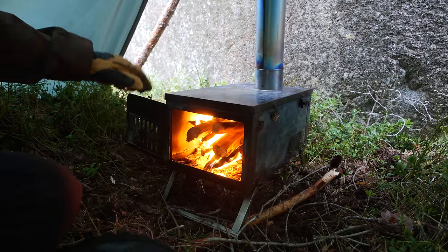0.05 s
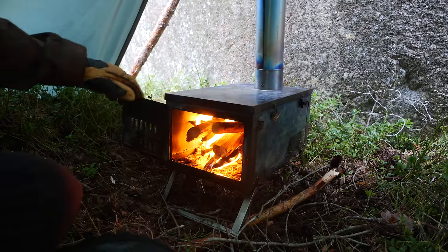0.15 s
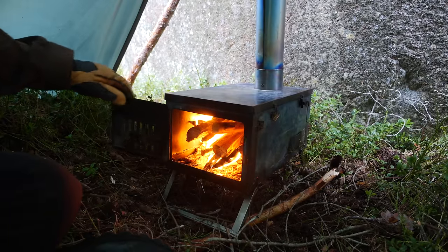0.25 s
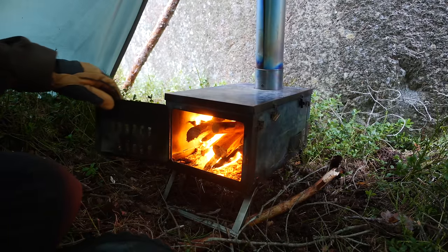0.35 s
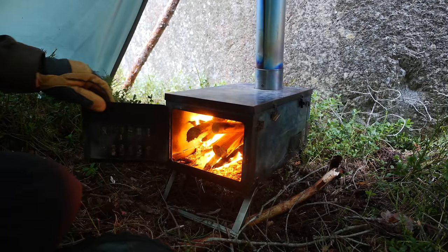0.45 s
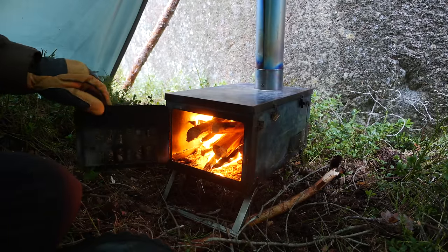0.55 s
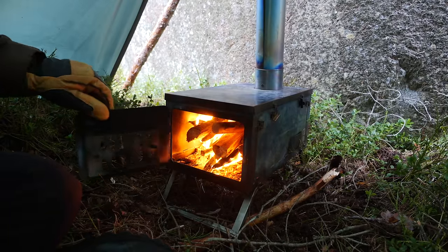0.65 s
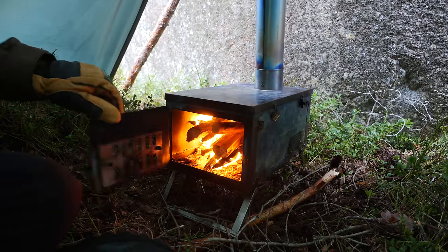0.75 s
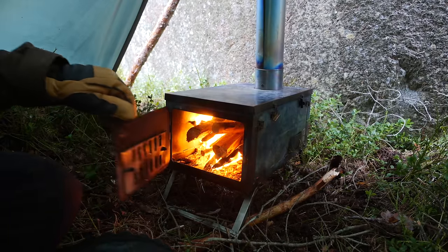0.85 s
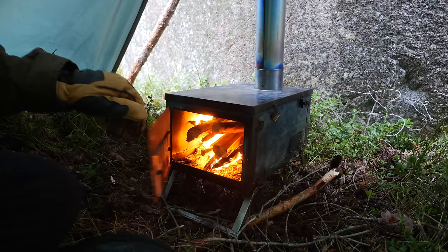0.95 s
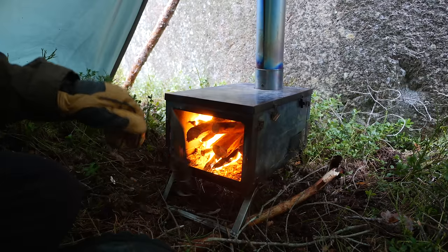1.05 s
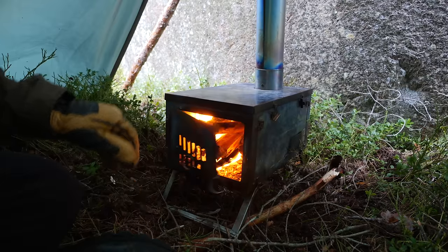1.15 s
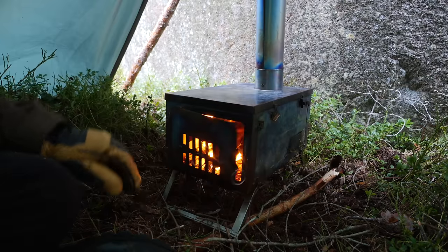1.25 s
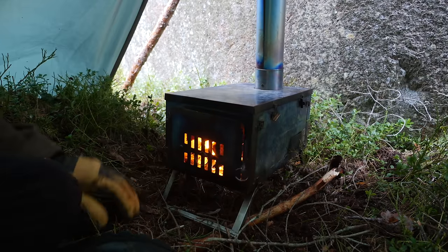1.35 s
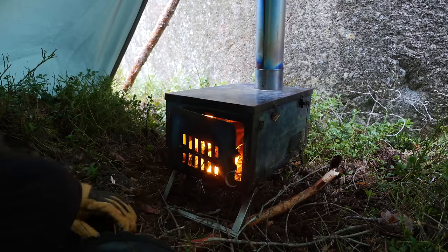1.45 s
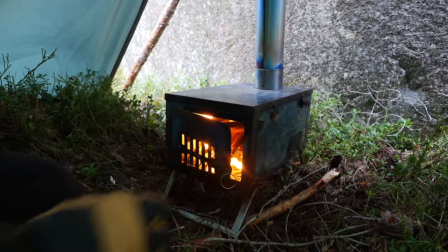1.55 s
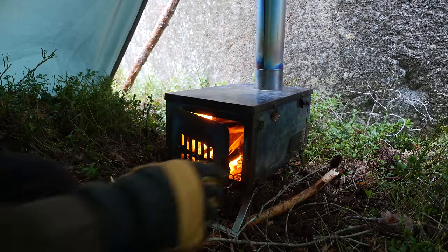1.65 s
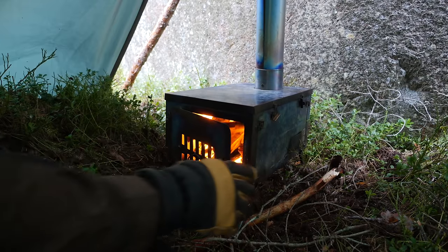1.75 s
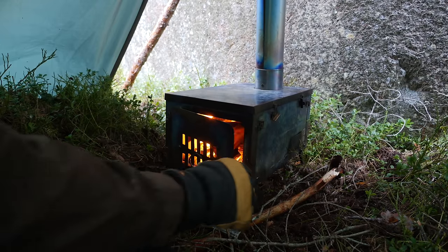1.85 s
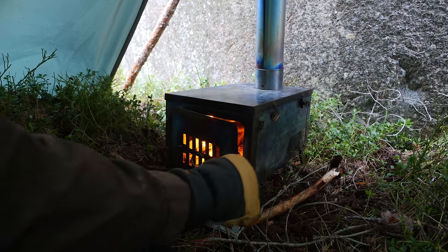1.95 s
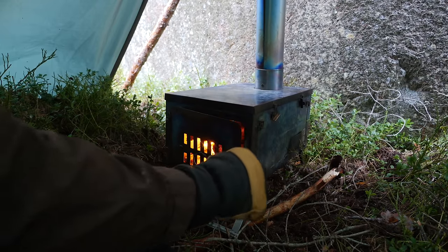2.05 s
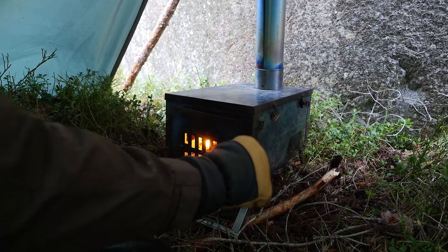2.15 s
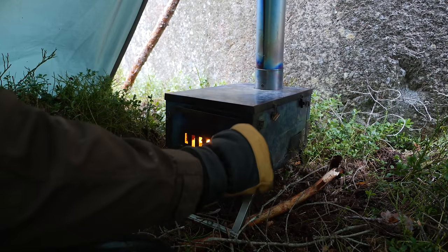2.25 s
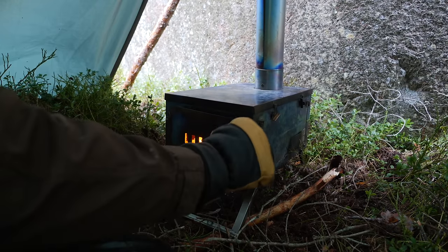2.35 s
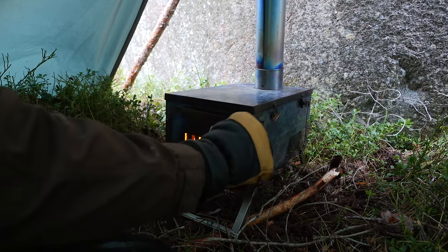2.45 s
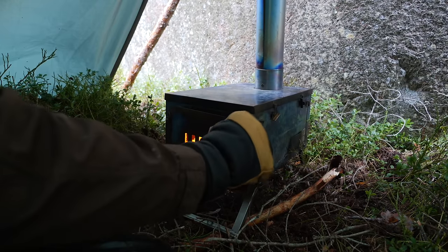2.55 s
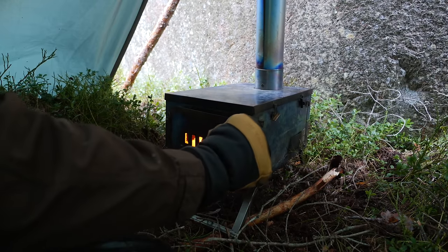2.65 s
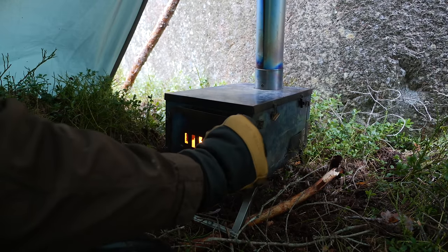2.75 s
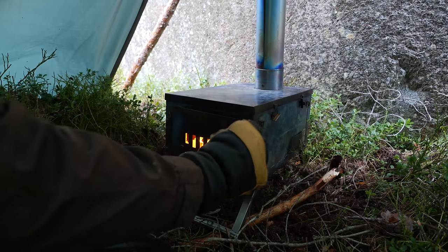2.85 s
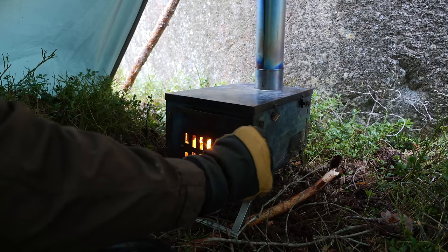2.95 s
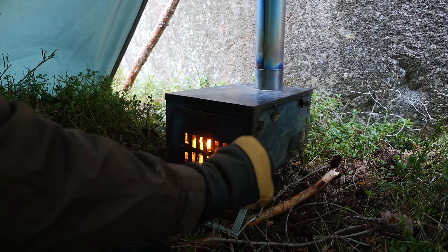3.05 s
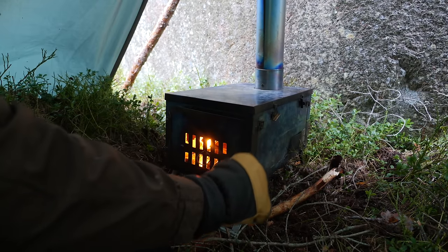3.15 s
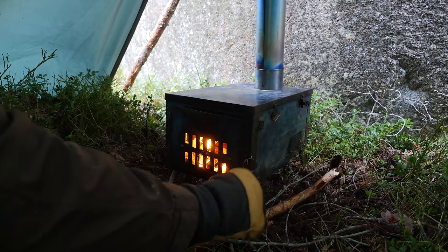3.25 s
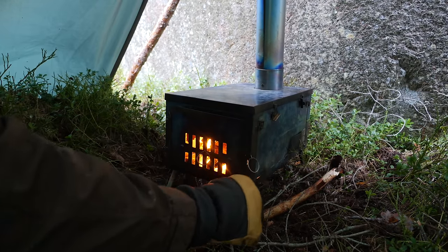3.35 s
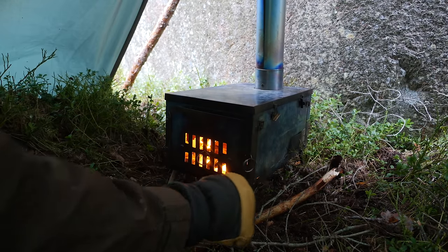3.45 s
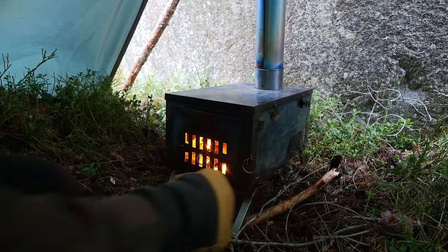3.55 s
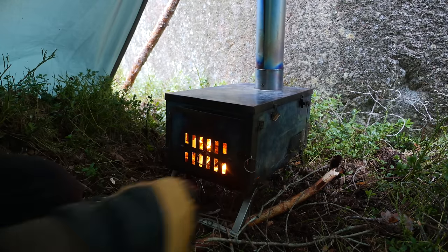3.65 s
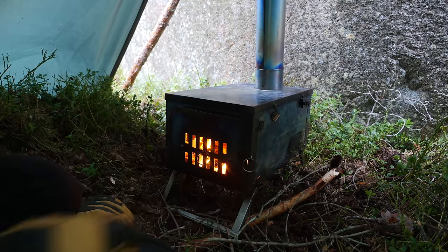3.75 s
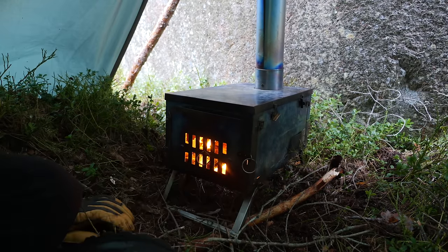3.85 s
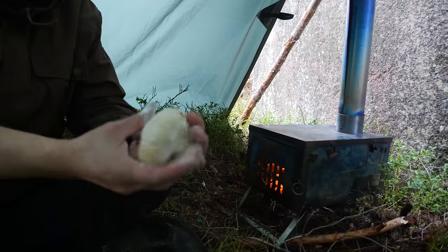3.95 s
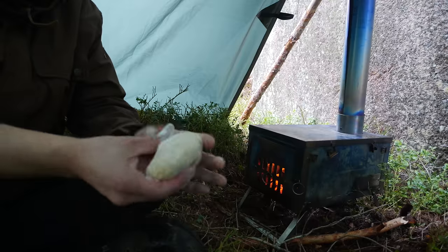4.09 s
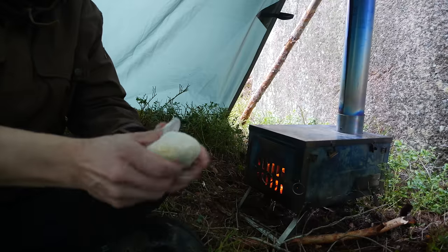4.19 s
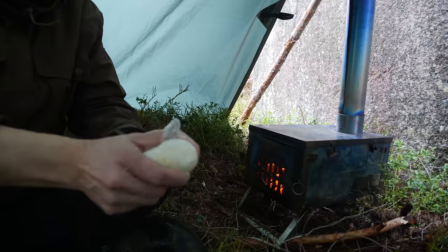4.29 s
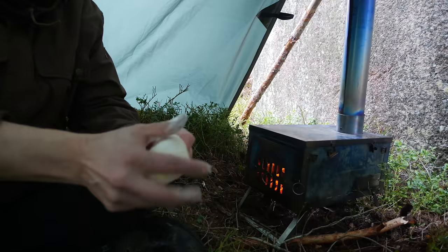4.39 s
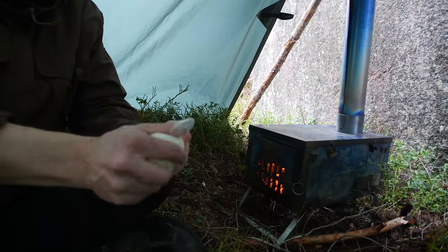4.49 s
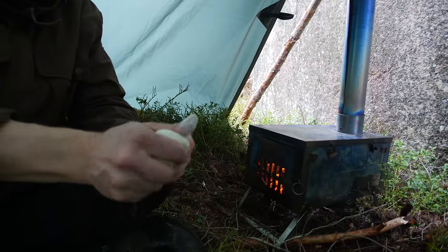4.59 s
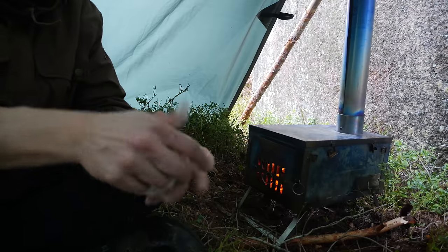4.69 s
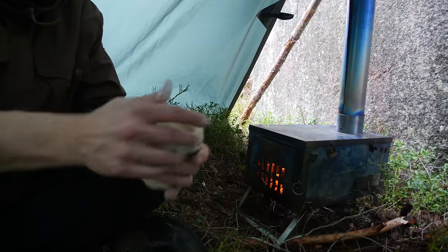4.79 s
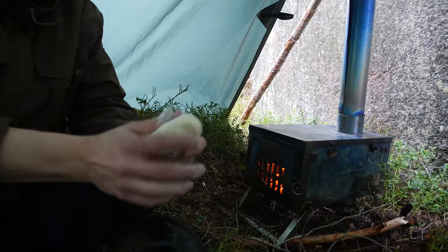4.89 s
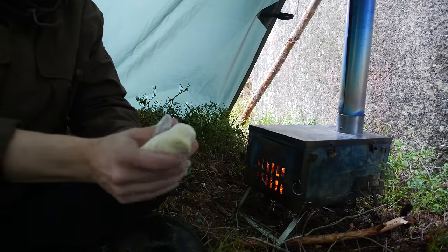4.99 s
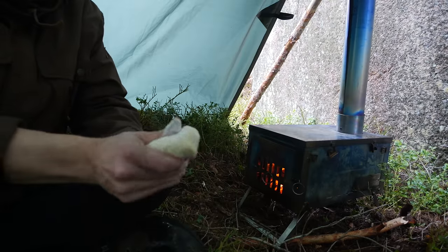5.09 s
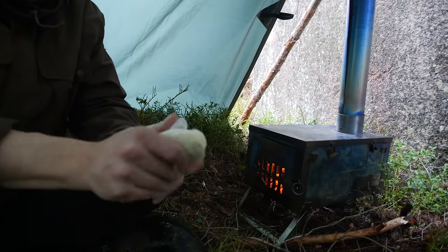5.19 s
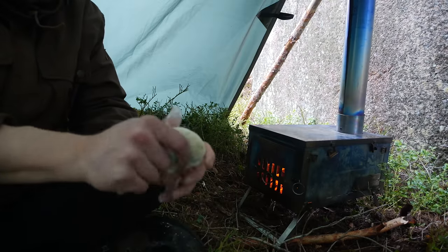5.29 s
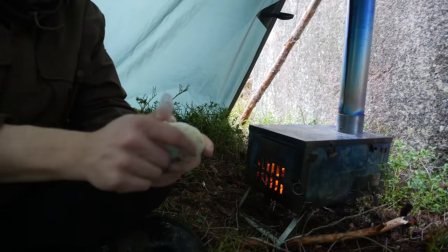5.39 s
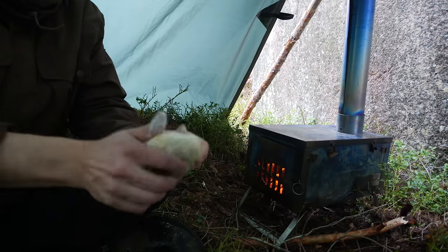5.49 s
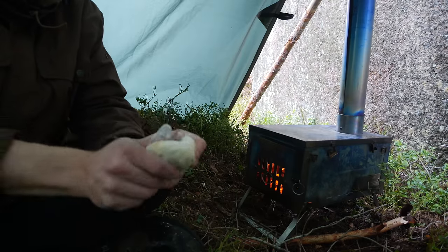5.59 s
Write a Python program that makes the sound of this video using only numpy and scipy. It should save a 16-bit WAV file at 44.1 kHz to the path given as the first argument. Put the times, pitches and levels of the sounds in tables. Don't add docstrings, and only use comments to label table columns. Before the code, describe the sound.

A gloved hand swings a thin stove door with light knocks and gritty drags, then slams it with a bright clang and brief chatter. Cloth brushes past, the latch is worked with sharp clacks and drops shut. The low hush of fire and outdoors dips at the cut, leaving muffled pats and skin rubbing dough. Close microphone, very short dull fabric tail.

```python
import sys
import numpy as np
from scipy import signal
from scipy.fft import rfft, irfft, next_fast_len
from scipy.io import wavfile
from scipy.ndimage import uniform_filter1d

SR = 44100
rng = np.random.default_rng(int(sys.argv[2]) if len(sys.argv) > 2 else 0)


def magnitude_from_level(level_db):
    exponent = np.asarray(level_db, float) / 20
    return 10 ** exponent


def master_out(mix):
    frames = np.transpose(np.atleast_2d(mix))
    ceiling = np.clip(frames, -1, 1)
    pcm = np.round(ceiling * 32767).astype(np.int16)
    wavfile.write(sys.argv[1], SR, pcm)


N = 248179

# f/Hz, density/dB per Hz
STEEL_SPECTRUM = [(71, -34), (120, -8), (170, 0.5), (237, 2.5), (358, -3.5), (540, -1.5), (832, 2),
                  (922, -2.5), (1260, -1), (4600, -8.5), (8020, -9.5), (10500, -13), (14000, -14),
                  (15500, -16), (16500, -35)]


def evened(x):
    return x / np.sqrt(np.mean(x ** 2) + 1e-20)


def read(points, hz):
    f, value = np.transpose(points)
    return np.interp(np.log(hz + 1), np.log(f + 1), value)


def add(mix, s, sound):
    part = mix[round(s * SR):][:len(sound)]
    part += sound[:len(part)]


def strokes(rows):
    stroke_db = 24.5
    dulling = 0.18
    s, level_db, rise, fall, tilt = np.transpose(rows)[:, :, None]
    t = np.arange(max(s.min() - .12, 0), min(s.max() + .3, N / SR), .001)
    lost_db = stroke_db * np.maximum((s - t) / abs(rise), (t - s) / abs(fall))
    power = magnitude_from_level(2 * (level_db - lost_db)) + 1e-14
    total = power.sum(0)
    dulled = tilt - dulling * np.minimum(lost_db, 30)
    return np.c_[t, 10 * np.log10(total), (power * dulled).sum(0) / total]


def grains(size, per_s, spread_db, hiss):
    hit = rng.random(size) < per_s / SR
    big = np.minimum(rng.exponential(1, size), 4)
    noise = rng.standard_normal((2, size))
    clicks = hit * magnitude_from_level(spread_db * big) * np.sign(noise[0])
    return evened(clicks) + hiss * noise[1]


def shaped(x, colour, tilt, patchy_db):
    hz, t, z = signal.stft(x, SR, nperseg=512, noverlap=384)
    patches = uniform_filter1d(rng.standard_normal(z.shape), 6, 0)
    patches = evened(uniform_filter1d(patches, 14, 1))
    z = z * magnitude_from_level(read(colour, hz)[:, None] + patchy_db * patches)
    z = z / np.sqrt(2 * np.mean(np.sum(abs(z[12:70]) ** 2, 0)) / 1.5)
    octaves = np.log2((hz[:, None] + 200) / 2500)
    slope_db = np.interp(t, np.arange(len(x)) / SR, tilt) * octaves
    return signal.istft(z * magnitude_from_level(slope_db), SR, nperseg=512, noverlap=384)[1][:len(x)]


def rub(tables, colour, per_s, spread_db, hiss, patchy_db, bodies=([1.],)):
    out = np.zeros(N)
    for rows in tables:
        s, level_db, tilt = np.transpose(rows)
        t = np.arange(s[0], s[-1], 1 / SR)
        drive = np.zeros(len(t))
        for body in bodies:
            drive += signal.oaconvolve(grains(len(t), per_s, spread_db, hiss), body)[:len(t)]
        sound = shaped(drive, colour, np.interp(t, s, tilt), patchy_db)
        ends = signal.windows.tukey(len(t), min(800 / len(t), 1))
        add(out, s[0], sound * magnitude_from_level(np.interp(t, s, level_db)) * ends)
    return out


def air():
    # f/Hz, density/dB per Hz
    hush_spectrum = [(13, -33), (22, -24), (289, -3), (628, -9.5), (702, -9), (762, -4.5), (1330, -11.5),
                     (2310, -16), (3910, -15.5), (5450, -18.5), (13200, -23), (15200, -23), (16500, -42)]
    hush_db, hush_drop_db = -56, -4
    roar_db, roar_drop_db, roar_top_hz = -59.5, -5, 152
    change_s = 3.96
    hz, _, z = signal.stft(rng.standard_normal(N), SR, nperseg=2048)
    z = z * magnitude_from_level(read(hush_spectrum, hz))[:, None]
    hush = evened(signal.istft(z, SR, nperseg=2048)[1][:N])
    low_band = signal.butter(2, [38, roar_top_hz], "band", fs=SR)
    roar = evened(signal.lfilter(*low_band, rng.standard_normal(N)))
    lumps = evened(uniform_filter1d(rng.standard_normal(N), 2000))
    after = np.clip((np.arange(N) / SR - change_s) / 0.0067, 0, 1)
    hush *= magnitude_from_level(hush_db + hush_drop_db * after)
    return hush + magnitude_from_level(roar_db + 2.4 * lumps + roar_drop_db * after) * roar


def tent(x):
    t60 = .16
    t = np.arange(SR // 4) / SR
    tail = rng.standard_normal(len(t)) * magnitude_from_level(-60 * t / t60) * (t > .004)
    tail = signal.lfilter(*signal.butter(1, 6000, fs=SR), tail)
    return signal.fftconvolve(x, tail / np.linalg.norm(tail))[:N]


def dough():
    # peak t/s, level/dB, rise/s, fall/s, tilt/dB per octave
    kneading = [(3.97, -55.5, 0.017, 0.32, 1.5), (4.0, -57, .015, 0.18, -2), (4.19, -63, 0.11, 0.17, 1),
                (4.14, -57.5, 0.08, 0.037, -1), (4.31, -64, 0.05, 0.17, 3), (4.415, -65, 0.037, 0.092, 6),
                (4.29, -70, 0.74, 0.78, 7), (4.446, -54, 0.13, 0.02, 2.5), (4.52, -59.5, 0.62, 0.25, -2),
                (4.588, -60, 0.054, 0.31, -1), (4.664, -55, 0.01, .03, -2), (4.71, -56.5, 0.04, 0.036, 0.3),
                (4.804, -54, 0.13, 0.14, 0.5), (4.912, -59, .02, .1, -1), (4.945, -56, 0.17, 0.24, -1.5),
                (5.05, -56.5, 0.27, 0.2, 0.5), (5.28, -53, 0.36, 0.089, -1.1), (5.2, -64.5, 0.066, 0.12, 8),
                (5.295, -59.5, 0.089, .06, 3), (5.41, -60.5, 0.055, .2, -1), (5.49, -56, 0.15, 0.28, -1),
                (5.535, -57, .1, .05, 0), (5.59, -57, 0.057, 0.43, -3)]
    # f/Hz, density/dB per Hz
    skin = [(180, -9), (300, -6.5), (1450, -9.5), (1630, -7.5), (1870, -11.5), (2240, -9), (2610, -9.5),
            (8440, -7), (14900, -9.5), (15700, -15), (16500, -39)]
    return rub([strokes(kneading)], skin, per_s=3000, spread_db=0.5, hiss=0.79, patchy_db=-0.5)


def sleeve():
    # t/s, level/dB, tilt/dB per octave
    sweeps = [
        [(1.46, -47, -6), (1.55, -44, -1), (1.62, -43.5, 1.5), (1.78, -43, 1), (1.86, -48.5, -0.4),
         (1.93, -60, 0.5)],
        [(3.48, -48, 1), (3.56, -51.5, 0), (3.7, -46.5, 0.1), (3.86, -49.5, -1), (3.92, -49, -0.5),
         (3.965, -50, -0.5)],
    ]
    # f/Hz, density/dB per Hz
    cloth = [(59, -32), (100, -5.5), (427, 4), (507, -6), (745, 2.5), (963, -2.5), (1120, 1), (1870, -3.5),
             (8150, -12), (15100, -20), (16500, -40)]
    return rub(sweeps, cloth, per_s=5900, spread_db=1.5, hiss=0.85, patchy_db=1.3)


def thumps():
    # t/s, peak/dB, f/Hz, t60/s
    knocks = [(0.168, -29, 197, 0.027), (0.214, -42.5, 190, 0.45), (0.521, -36.5, 133, 0.14),
              (0.58, -44, 110, 0.12), (1.375, -26.5, 169, 0.2), (1.878, -47, 97, .08),
              (2.2, -28, 99, 0.032), (2.568, -43, 188, 0.19), (2.822, -31, 106, 0.04),
              (3.138, -45, 160, 0.22), (3.367, -27, 119, 0.023), (3.526, -24.5, 104, 0.025),
              (3.836, -36.5, 103, 0.059), (4.27, -49.5, 104, 0.11), (4.039, -37.5, 139, 0.038),
              (4.398, -39, 142, 0.043), (5.035, -44.5, 150, 0.082), (5.262, -44.5, 200, .05)]
    out, t = np.zeros(N), np.arange(8000) / SR
    for s, db, hz, t60 in knocks:
        swell = 1 - np.exp(-t / 0.0032)
        add(out, s, magnitude_from_level(db - 60 * t / t60) * np.sin(2 * np.pi * hz * t) * swell)
    return out


def snaps():
    # t/s, peak/dB, centre f/Hz
    crackle = [(.2824, -41, 15500), (.2964, -43, 15500), (.3094, -40, 15300), (.5695, -16, 14000),
               (1.0744, -40, 15100), (1.0994, -44, 15100), (1.3651, -9, 13500), (1.3896, -18, 13500),
               (1.408, -15, 13000), (1.427, -22, 14800), (1.4596, -30, 13500), (2.181, -31, 14500),
               (3.3312, -42, 13500), (3.3438, -46, 12700), (3.3722, -44, 13000), (3.3846, -46, 12900),
               (3.430, -48, 13400), (3.8944, -36, 15100), (3.9865, -25, 13500)]
    # t/s, peak/dB, centre f/Hz
    ticks = [(0.338, -41.5, 3320), (.531, -27, 3180), (0.5693, -24, 6500), (0.667, -36, 4500),
             (1.1447, -29, 3160), (1.1817, -41, 2200), (1.2048, -34, 3000), (1.2165, -38, 7800),
             (1.236, -28.5, 1920), (2.1808, -26, 8130), (2.4836, -39, 7600), (2.7796, -34, 2400),
             (2.8948, -31, 3250), (2.9193, -28, 3300), (3.399, -44, 4000), (4.6638, -46, 5380),
             (4.7032, -44, 7770), (5.27, -41, 3000)]
    # t/s, peak/dB, t60/s
    latch = [
        (1.3629, -10, .012),
        (1.365, -5.5, .022),
        (1.947, -24.5, .12),
        (2.0145, -33, .08),
        (2.832, -42, .25),
        (3.4667, -20, .1),
        (3.4695, -22, .03),
        (3.562, -27, .015),
    ]
    rows = [(*row, 0.0041) for row in crackle]
    rows += [(*row, 0.019) for row in ticks]
    rows += [(s, db, 7400, t60) for s, db, t60 in latch]
    out, t = np.zeros(N), np.arange(2000) / SR
    for s, db, hz, t60 in rows:
        snap = rng.standard_normal(len(t)) * magnitude_from_level(-60 * t / t60)
        snap[0] = 6
        for _ in range(1 + (hz > 10000)):
            snap = signal.lfilter(*signal.iirpeak(min(hz, 15500), 2.2, SR), snap)
        add(out, s, magnitude_from_level(db) * snap / abs(snap).max())
    return out


def squeaks():
    # t/s, peak/dB, pitch f/Hz, length/s, octave level/dB
    slips = [(.365, -47, 2050, .03, -12), (.42, -46, 3650, .085, -25), (.73, -46, 1300, .07, -25),
             (.86, -42, 1030, .06, -14), (.916, -42, 6680, .025, -7), (1.47, -37, 780, .055, -12),
             (.957, -43, 8020, .022, -18), (.967, -43, 7400, .038, -22), (1.224, -43, 900, .035, -25),
             (1.255, -45, 780, .06, -25), (1.59, -41, 1300, .045, -25), (2.27, -45, 1500, .025, -4),
             (2.335, -53, 3250, .035, -25), (3.156, -31, 7900, .012, -30), (3.467, -32, 4850, .008, -25),
             (3.47, -39, 7350, .055, -30), (3.468, -40, 8050, .02, -30), (3.492, -43, 5380, .03, -25),
             (4.803, -43, 3600, .022, -25), (4.965, -60, 4270, .045, -25), (5.0, -56, 3950, .075, -25),
             (5.265, -49, 2200, .03, -25)]
    out = np.zeros(N)
    for s, db, hz, length, octave_db in slips:
        t = np.arange(0, length, 1 / SR)
        wobble = evened(uniform_filter1d(rng.standard_normal(4000), 90))[:len(t)]
        pitch = hz * (1 + .005 * wobble) + 28 * wobble
        turn = 2 * np.pi * np.cumsum(pitch) / SR
        shape = (1 - np.exp(-t / .002)) * np.cos(np.pi / 2 * t / length) * (1 + .5 * wobble[::-1])
        add(out, s, magnitude_from_level(db) * shape * (np.sin(turn) + magnitude_from_level(octave_db) * np.sin(2 * turn)))
    return out


def gap_whistle():
    # t/s, level/dB, pitch f/Hz
    squeeze = [
        (1.368, -40, 1600),
        (1.382, -29, 1380),
        (1.395, -27, 1230),
        (1.408, -28, 1060),
        (1.42, -40, 980),
    ]
    width_hz = 80
    s, level_db, hz = np.transpose(squeeze)
    t = np.arange(s[0], s[-1], 1 / SR)
    low_pass = signal.butter(1, width_hz / 2, fs=SR)
    slow = signal.lfilter(*low_pass, rng.standard_normal((2, 4000)))[:, -len(t):]
    turn = 2 * np.pi * np.cumsum(np.interp(t, s, hz)) / SR
    whistle = evened((evened(slow[0]) + 1) * np.cos(turn) + evened(slow[1]) * np.sin(turn))
    out = np.zeros(N)
    add(out, s[0], magnitude_from_level(np.interp(t, s, level_db)) * whistle * signal.windows.tukey(len(t), .2))
    return out


def struck_modes():
    # t/s, peak/dB, f/Hz, t60/s
    struck = [(.176, -43, 13000, .04), (0.176, -38, 586, 0.026), (.2005, -41, 14300, .05),
              (.43, -38.5, 3130, 0.067), (0.4643, -40, 3240, 0.054), (.506, -39, 2780, .03),
              (.518, -40, 3300, .04), (.533, -36, 3200, .08), (.574, -40, 1280, .03),
              (.593, -43, 3200, .12), (1.37, -29, 1690, .2), (1.3645, -14, 7410, .022),
              (1.3648, -15, 9120, .02), (1.3648, -14, 13000, .022), (1.42, -36, 986, 0.2),
              (1.372, -37, 475, 0.38), (1.375, -36, 297, 0.25), (1.364, -31.5, 670, 0.18),
              (1.4, -38, 1630, .3), (1.49, -37, 599, 0.15), (2.022, -39, 7780, 0.089),
              (2.023, -45, 13500, .04), (2.073, -51, 13500, .015), (2.226, -51, 12600, .03),
              (2.779, -26, 3000, 0.0035), (2.8943, -34, 1660, 0.044), (2.8965, -41.5, 3490, 0.11),
              (2.92, -32.5, 1400, 0.03), (2.92, -41, 3430, 0.093), (3.1825, -27.5, 2090, 0.064),
              (3.1835, -34, 7900, 0.07), (3.182, -37, 3130, .08), (3.1828, -33, 14000, .04),
              (3.2385, -38, 3290, 0.21), (3.2393, -32, 7900, 0.036), (3.2393, -32, 13000, .03),
              (3.239, -39, 1280, .04), (3.3496, -55, 14500, 0.0091), (3.3616, -62.5, 9200, 0.014),
              (3.358, -58, 2870, 0.16), (3.3978, -49, 2500, 0.0074), (3.466, -27, 13900, .02),
              (3.4668, -34, 4920, 0.057), (3.4673, -33.5, 686, 0.045), (3.483, -31, 12500, .012),
              (3.5474, -58, 12700, .015), (3.5625, -36, 13600, .02), (3.987, -39.5, 8300, 0.014),
              (4.661, -52.5, 654, 0.089), (4.92, -49, 7400, .03)]
    # t/s, peak/dB, f/Hz, t60/s
    soft = [(3.12, -38.5, 70, 0.14), (3.209, -44, 90, 0.13), (3.29, -44, 75, .12), (3.68, -51, 69, 0.088),
            (3.98, -45, 90, 0.074), (4.1, -47, 80, 0.092), (4.29, -44, 220, 0.052),
            (4.504, -47.5, 336, 0.055), (4.56, -46, 109, 0.088), (4.59, -52, 300, 0.067),
            (4.91, -44, 90, .08), (4.94, -46, 289, 0.072), (4.98, -44, 90, .06), (5.115, -37, 152, 0.043),
            (5.19, -56, 7500, .04), (5.262, -47, 567, .05), (5.268, -49, 920, .05), (5.41, -43, 140, .05),
            (5.49, -48, 90, .06), (5.53, -48, 100, 0.051), (5.59, -59, 220, .06)]
    # t/s, peak/dB, f/Hz, t60/s
    left_ringing = [(.37, -48, 1606, .16), (.374, -46, 2340, 0.16), (.409, -42, 4500, .05),
                    (.411, -47, 5050, .1), (.488, -43, 1020, .08), (1.366, -31, 5200, 0.13),
                    (1.368, -26, 8300, 0.23), (1.392, -30, 330, 0.13), (1.452, -29.5, 1040, .12),
                    (1.495, -33, 723, .12), (2.896, -44, 2342, .15), (3.157, -25, 5030, 0.021),
                    (3.156, -39, 2990, .09), (3.158, -31, 297, .1), (3.188, -34, 1300, 0.073),
                    (3.25, -34.5, 994, 0.12), (3.725, -43, 1120, 0.1), (3.798, -50, 350, 0.073)]
    out, t = np.zeros(N), np.arange(8000) / SR
    for rows, neighbour in [(struck + soft, .4), (left_ringing, 0)]:
        for s, db, hz, t60 in rows:
            tone = np.sin(2 * np.pi * hz * t)
            tone += neighbour * np.sin(2 * np.pi * hz * rng.uniform(.95, 1.05) * t)
            add(out, s, magnitude_from_level(db - 60 * t / t60) * tone * (1 - np.exp(-t * hz / 2)))
    return out


def latch_slide():
    # peak t/s, level/dB, rise/s, fall/s, tilt/dB per octave
    slide = [
        (3.46, -52.5, 0.044, .02, 0.93),
    ]
    return rub([strokes(slide)], STEEL_SPECTRUM, per_s=1300, spread_db=0.0, hiss=0.4, patchy_db=1.0)


def moan():
    # peak t/s, level/dB, rise/s, fall/s
    drags = [
        (.16, -53, 0.023, 0.11),
        (.56, -60, .1, .4),
        (.8, -58, .12, .3),
        (1.03, -53, 0.69, 0.25),
        (2.256, -46, 0.14, 0.35),
        (2.43, -51.5, 0.36, 0.17),
        (2.538, -48.5, 0.13, 0.091),
        (2.932, -48.5, 0.12, 0.071),
        (3.174, -41.5, 0.1, 0.24),
        (3.451, -55, 0.018, 0.026),
    ]
    mode_hz, width_hz = 350, 57
    hum = signal.lfilter(*signal.iirpeak(mode_hz, mode_hz / width_hz, SR), rng.standard_normal(N))
    s, level_db, _ = strokes([(*row, 0) for row in drags]).T
    return evened(hum) * magnitude_from_level(np.interp(np.arange(N) / SR, s, level_db))


def sheet(count=520):
    # f/Hz, t60/s
    decay = [(150, 0.76), (500, 0.7), (1200, 0.49), (3000, 0.66), (7500, 0.35), (14000, 0.31)]
    # f/Hz, rise/s
    swing_up = [
        (200, 0.045),
        (1200, 0.01),
        (3000, 0.0017),
        (8000, 0.00077),
    ]
    # f/Hz, level above the rest/dB
    strong = [(190, 6), (355, 5), (1032, 6), (1088, 5), (1224, 3), (2990, 3), (3780, 3), (5300, 4),
              (7040, 3), (7380, 5), (7900, 4), (8270, 3), (12300, 2), (12570, 3)]
    strong_hz, strong_db = np.transpose(strong)
    even_hz = np.linspace(130, 16900, count) + rng.uniform(-14, 14, count)
    hz = np.r_[strong_hz, even_hz][:, None]
    t60 = read(decay, hz) * rng.uniform(1.0, 1.02, hz.shape)
    t = np.arange(SR // 4) / SR
    ring = np.exp((2j * np.pi * hz - np.log(1000) / t60) * t)
    ring = ring * (1 - np.exp(-t / read(swing_up, hz)))
    return hz[:, 0], np.r_[strong_db, np.zeros(count)], ring


def steel(count=3):
    # t/s, peak/dB, door body/dB, hard edge/dB, t60 left by glove and frame/s
    blows = [(0.138, -50, -2, 12.5, 0.18), (0.156, -26, 12.5, -6, 0.096), (0.2007, -24, 6, 4.5, 0.062),
             (0.376, -24.5, 5.5, -12, 0.1), (0.4126, -30, -8.5, -10, 0.26), (0.529, -36, 8.5, 5, 0.85),
             (0.798, -25.5, -8.5, 2.5, 0.29), (1.144, -38, -10, 11, 0.089), (1.948, -19.5, -15.5, -3, 0.24),
             (2.0132, -33, 15, -8, 0.11), (2.024, -26.5, -8, 4, 0.091), (2.0397, -23.5, -19, 10, 0.091),
             (2.2389, -12.5, -13, -9, 0.087), (2.5194, -31.5, 16, 1, 0.1), (2.7796, -51, -4, -14, 0.18),
             (2.8943, -28, 7, 6, 0.18), (2.9199, -21.5, 6, -2, 0.098), (3.0832, -42.5, 8, 6, 0.23),
             (3.132, -32.5, 8, 3.5, 0.34), (3.1564, -2.5, -21, -4.5, 0.24), (3.1834, -14, 3.5, 3, 0.091),
             (3.2397, -12.5, -6, 2, 0.11), (3.4652, -16, 0, -3, 0.33), (3.5609, -19, 4.5, -7.5, 0.23)]
    # t/s, peak/dB, door body/dB, hard edge/dB, t60/s
    slam = [
        (1.3628, -5, -6, 5, .06),
        (1.3652, -8.5, -3, 9, .45),
        (1.379, -20, 3, 3, .2),
        (1.3894, -16, 5, 4, .25),
        (1.4078, -17, 0, 7, .2),
        (1.427, -26, 0, 6, .15),
        (1.4594, -25, 6, 3, .3),
        (1.48, -35, 10, -5, .25),
    ]
    # peak t/s, level/dB, rise/s, fall/s, tilt/dB per octave
    scrapes = [(.162, -46, 0.019, 0.3, -3.5), (.4, -64, 0.033, 0.34, 0), (.49, -47, 0.2, 0.065, 1),
               (.415, -49, .02, 0.18, 0.5), (.46, -51.5, 0.095, 0.17, -5.5), (.51, -36, 0.037, 0.16, -2),
               (.537, -35, 0.075, 0.096, -3), (.6, -49.5, 0.06, 0.21, 2.5), (.668, -42, 0.017, 0.035, -4),
               (.78, -48.5, 1, 0.79, -4), (.868, -43.5, 0.079, 0.16, -3),
               (1.146, -41.5, 0.0094, 0.021, -3.5), (1.24, -48, 0.34, 0.39, -5),
               (1.32, -49.5, 0.15, 0.47, -4), (1.95, -44, 0.0092, 0.24, -5), (2.025, -50, 0.28, 0.25, 1.2),
               (2.2, -53, 0.22, 0.24, -4), (2.241, -46, 0.0067, 0.2, -4.5), (2.34, -48, 0.26, 0.2, -3),
               (2.422, -47, 0.054, 0.08, -2.5), (2.528, -43.5, 0.13, 0.15, -6.5),
               (2.545, -53, .05, .12, 5.5), (2.782, -43.5, 0.017, 0.13, -4.5), (2.88, -49, .02, 0.11, -3),
               (2.898, -41.5, 0.016, 0.11, -6.5), (2.94, -44.5, 0.068, 0.18, -6.5),
               (3.082, -44.5, 0.012, 0.12, -7.5), (3.158, -41, 0.004, 0.27, -8),
               (3.2, -35.5, .03, 0.11, -3), (3.242, -35.5, 0.0071, 0.11, -1.5),
               (3.29, -42.5, 0.12, 0.071, -5)]
    hz, strong_db, modes = sheet()
    steel_db = read(STEEL_SPECTRUM, hz)
    s, db, body_db, edge_db, t60 = np.transpose(blows + slam)[:, :, None]
    t, out = np.arange(modes.shape[1]) / SR, np.zeros(N)
    spread, phase = rng.standard_normal((count + len(s), len(hz), 2)).transpose(2, 0, 1)
    shares = magnitude_from_level(3.3 * spread - .8) * np.exp(10j * phase)
    body_share = read([(900, 0.96), (3500, 0.45)], hz)
    edge_share = read([(8000, 0.42), (12000, 1)], hz)
    mode_db = steel_db + 0.59 * strong_db + body_db * body_share + edge_db * edge_share
    rings = ((shares[count:] * magnitude_from_level(mode_db)) @ modes).real
    rings /= np.sqrt(np.sum(magnitude_from_level(2 * steel_db)))
    crack_db = 5 - 0.65 * body_db
    crack = 1 + magnitude_from_level(crack_db) * np.exp(-t / 0.00093)
    fades = magnitude_from_level(db - 9.0 - 60 * t / t60) * crack
    for start, sound in zip(s[:, 0], fades * rings):
        add(out, start, sound)
    held = (shares[:count] @ modes[:, :3000]).real * magnitude_from_level(-60 * t[:3000] / .08)
    return out + rub([strokes(scrapes)], STEEL_SPECTRUM, per_s=1600, spread_db=3.0, hiss=0.51,
                     patchy_db=2.3, bodies=held)


def scene():
    near = steel() + moan() + squeaks() + snaps() + thumps() + sleeve() + dough()
    tail = magnitude_from_level(-19) * tent(near)
    return (near + tail + air() + struck_modes() + gap_whistle() + latch_slide())[None]


def top_cut(x):
    return signal.sosfilt(signal.butter(12, 17010, fs=SR, output="sos"), x)


def record(dry):
    # f/Hz, gain/dB
    housing = [
        (3000, -0.5),
        (5000, 0),
        (6200, -2),
        (7600, 1.5),
        (9000, 0.5),
        (10600, -4.5),
        (12800, 0.5),
        (15000, -2.5),
    ]
    edge_hz, leak_db = 15850, -32
    size = next_fast_len(N)
    hz = np.fft.rfftfreq(size, 1 / SR)
    edge_db = np.interp(hz, [edge_hz, edge_hz + 200, 16800, 17000], [0, leak_db, leak_db - 8, -100])
    heard = irfft(rfft(dry, size) * magnitude_from_level(read(housing, hz) + edge_db), size)[:, :N]
    return top_cut(heard)


dry = scene()
out = record(dry)
master_out(out)
```